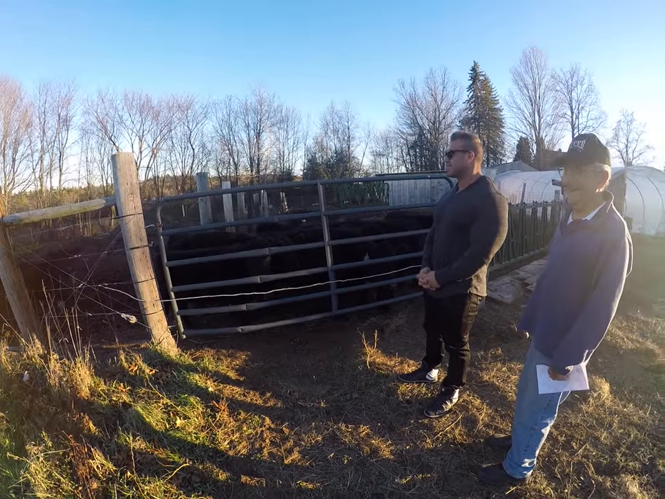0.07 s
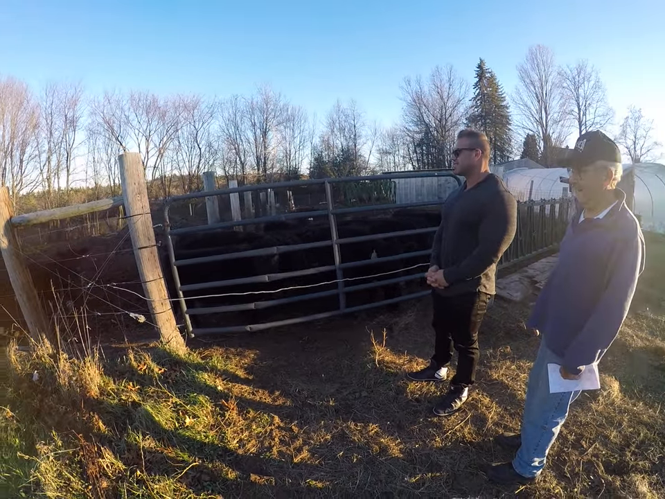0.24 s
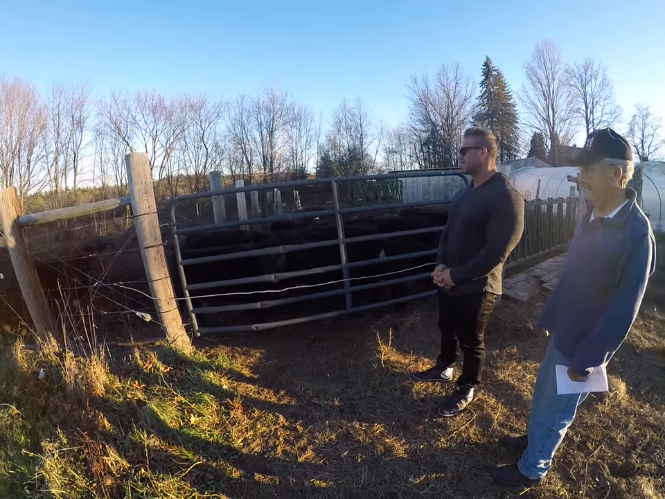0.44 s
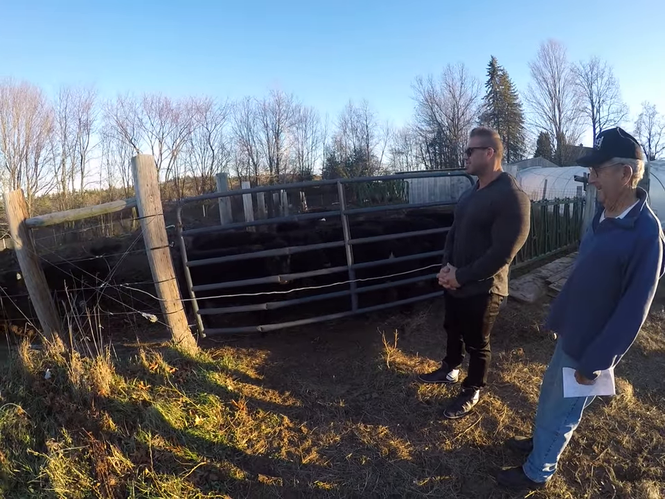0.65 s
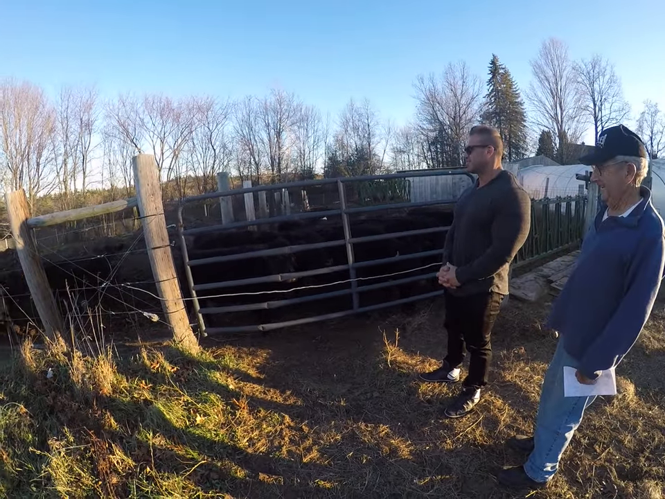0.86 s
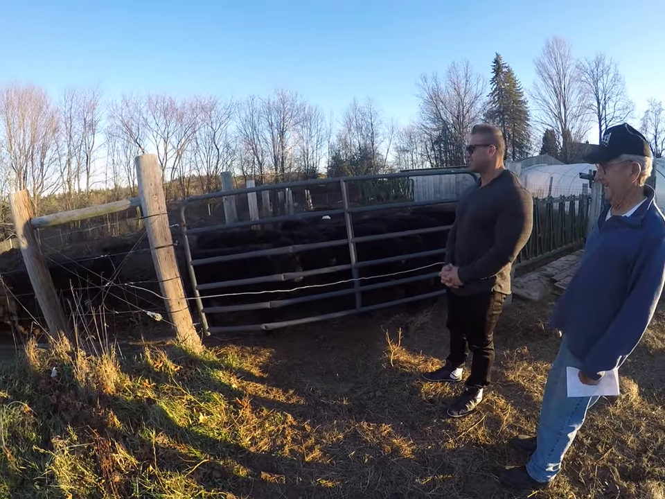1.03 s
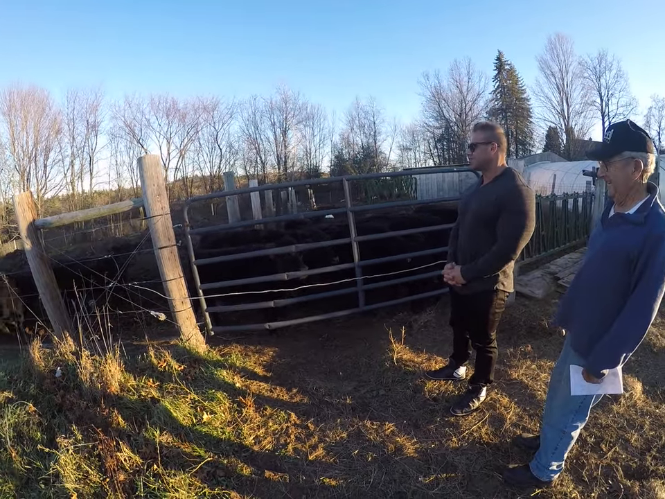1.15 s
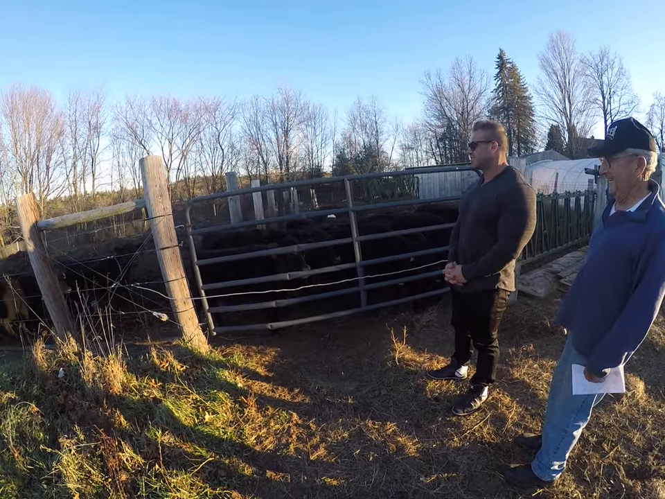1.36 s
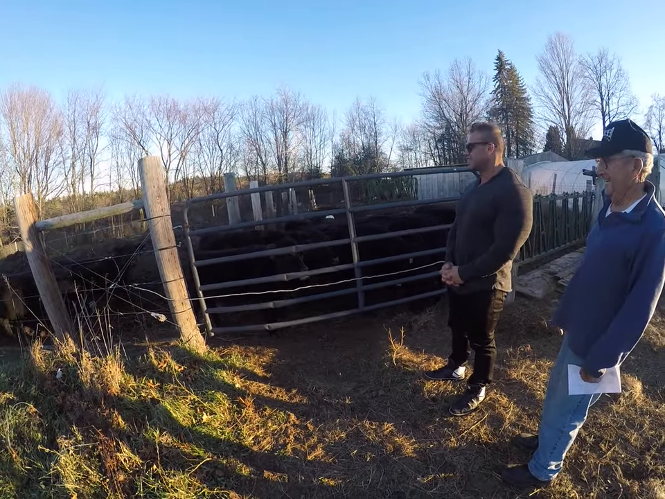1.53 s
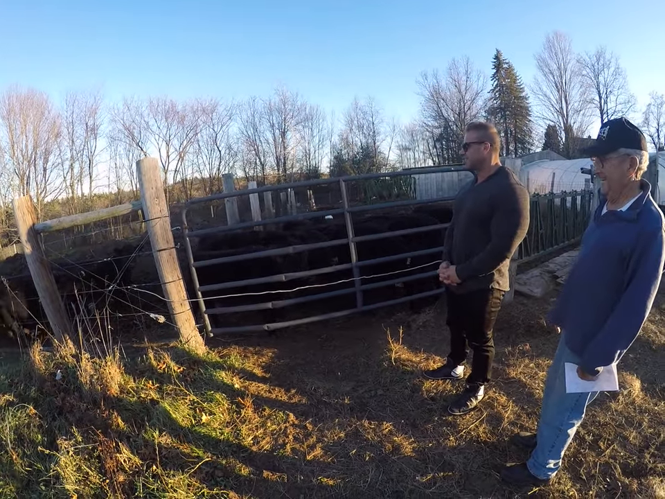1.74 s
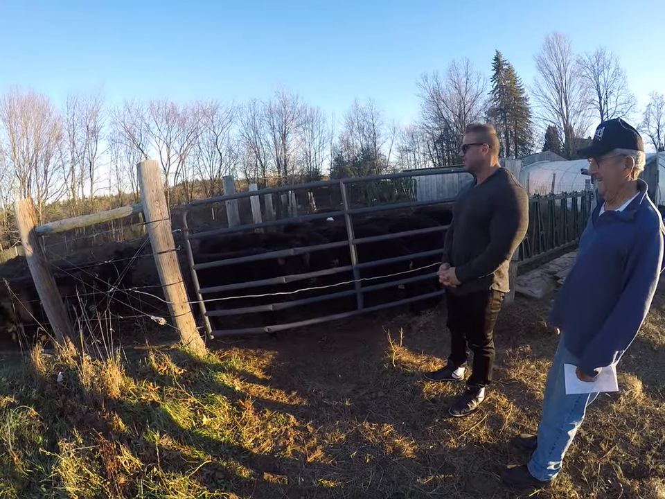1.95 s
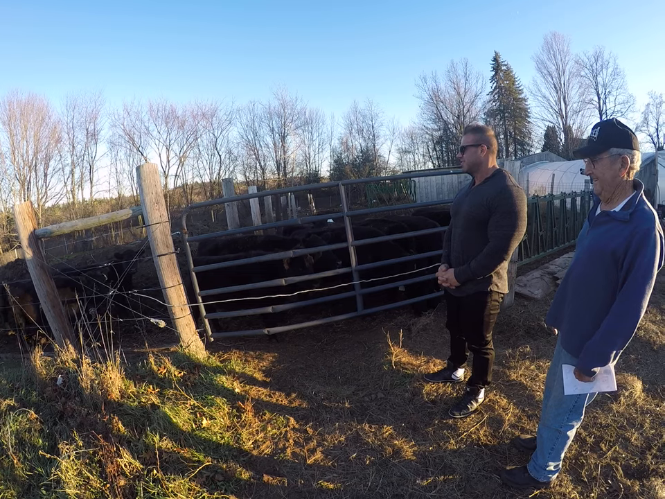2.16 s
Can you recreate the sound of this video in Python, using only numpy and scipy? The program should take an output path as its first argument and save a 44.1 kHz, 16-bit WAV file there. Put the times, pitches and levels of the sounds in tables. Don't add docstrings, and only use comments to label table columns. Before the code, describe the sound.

One cow moos a few metres away in an outdoor pen: a soft nasal hum climbs, opens into a loud held call, then sags and cuts off. Low wind rumble and distant road noise continue behind.

```python
import sys
import numpy as np
from scipy import signal
from scipy.io import wavfile
from scipy.ndimage import uniform_filter1d

SR = 44100
rng = np.random.default_rng(int(sys.argv[2]) if len(sys.argv) > 2 else 0)


def volts(x):
    e = np.asarray(x, float) / 20
    return 10 ** e


def dump(signal):
    limited = np.clip(np.atleast_2d(signal).T, -1, 1)
    pcm = np.round(limited * 32767).astype(np.int16)
    wavfile.write(sys.argv[1], SR, pcm)


N = 96755
STEP = 16


def in_time(rows):
    s, *columns = np.transpose(rows)
    steps = np.arange(0, N + STEP, STEP) / SR
    return [np.interp(steps, s, column) for column in columns]


def full(x):
    return np.interp(np.arange(N) / STEP, np.arange(len(x)), x)


def drift(rate_hz, count):
    r = np.exp(-2 * np.pi * rate_hz * STEP / SR)
    white = rng.standard_normal((count, N // STEP + 2002))
    slow = signal.lfilter([1], [1, -2 * r, r * r], white)[:, 2000:]
    return slow / slow.std(axis=1, keepdims=True)


def tract(resonances, hz):
    return np.sqrt(sum(volts(2 * db) / (1 + (2 * (hz - f) / w) ** 2) ** 3 for f, w, db in resonances))


# [t/s, f/Hz]
FOLD_PITCH = [
    (.17, 91),
    (.4, 109.2),
    (.58, 131.9),
    (.79, 192.2),
    (.93, 221),
    (1.14, 242),
    (1.42, 255.3),
    (1.478, 250),
    (1.55, 188.6),
]
# [t/s, breathy share 0-1, pitch jitter/%]
HOARSENESS = [
    (.17, .15, .3),
    (.6, .2, .4),
    (.7, .5, .6),
    (.8, .25, .2),
    (1, .17, .08),
    (1.43, .12, .06),
    (1.49, .3, .3),
    (1.53, .6, 1.0),
]


def vocal_folds():
    (pitch,), (breath, jitter) = in_time(FOLD_PITCH), in_time(HOARSENESS)
    inertia_s = 0.03
    pitch = uniform_filter1d(pitch, int(inertia_s * SR / STEP))
    pitch = pitch * (1 + jitter / 100 * drift(60, count=1)[0])
    phase = 2 * np.pi * np.cumsum(full(pitch)) / SR
    return pitch, phase, breath


# [t/s, level/dB, mouth opening 0-1, posture (0 half open, 1 wide, 2-3 neck stretched)]
EFFORT_COURSE = [
    (.14, -58.5, 0.093, 0),
    (.2, -37, 0, 0),
    (.42, -34, 0, 0.5),
    (.61, -37, 0.23, 1),
    (.69, -31.5, 0.44, 0),
    (.97, -27.5, 0.83, 1.5),
    (1.13, -27, 0.82, 1.5),
    (1.44, -28, 0.96, 3),
    (1.515, -27, 0.89, 0),
]
# [f/Hz, width/Hz, level/dB]
NASAL = [(123, 35, -0.5), (240, 160, -14), (804, 420, -78), (2742, 240, -16.5), (3350, 180, -25),
         (4024, 170, -22.5), (4790, 150, -27.5), (6300, 450, -41.5)]
# [f/Hz, width/Hz, level/dB half open, level/dB wide, level/dB stretched]
THROAT = [(458, 500, -3.5, -12.5, -7.5), (719.2, 100, 3.5, -1, 0.5), (833.4, 81, -8, 1, -19),
          (1024, 96, -15.5, -2.5, -7), (1140.5, 194, -2, 1.5, 2.5), (1225, 95, -7, -32, -3),
          (1614, 205, 2.5, -10.5, -12.5), (1804.5, 228, -14, -1.5, -5.5), (2129, 170, -9.5, -5.5, -35.5),
          (2539, 295, -11.5, -15.5, -19.5), (3043, 100, -20.5, -18.5, -21.5), (3268, 210, -9, -24, -19.5),
          (3763, 140, -45.5, -29, -36), (5150, 330, -31, -33, -31.5)]
# [f/Hz, width/Hz, level/dB]
CHEST_CAVITY = [(247.1, 42, 9), (209.5, 37, -1)]


def cow():
    s = np.arange(0, N + STEP, STEP) / SR
    pitch, phase, breath = vocal_folds()
    level_db, mouth, neck = in_time(EFFORT_COURSE)
    release_db_per_s = 597
    level_db = level_db - release_db_per_s * np.maximum(s - EFFORT_COURSE[-1][0], 0)
    mouth, neck = np.clip(mouth, 0, 1), np.clip(neck, 0, 3)

    stretch_rise, stretch_from_hz = 0.032, 1700
    throat = []
    for f, w, *db in THROAT:
        moved_hz = f * (1 + stretch_rise * neck * (f > stretch_from_hz))
        throat.append((moved_hz, w, np.interp(neck, [0, 1, 2], db)))
    nose_sink = 1 + 0.18 * (s - 0.405)

    count, waver_db, breath_full_hz = 70, 2.5, 3000
    waver, blur = drift(4.1, count), drift(88, 2 * count)
    start = rng.uniform(-1, 1, count) * np.where(np.arange(count) < 12, 1.8, 0.5)
    voice = np.zeros(N)
    for k in range(1, count):
        hz = k * pitch
        nose = tract(NASAL, hz * nose_sink)
        valley = volts(-26 - 8.5 * np.log2(hz / 1000))
        opened = tract(throat, hz) + tract(CHEST_CAVITY, hz) + valley
        effort = volts(level_db + waver_db * mouth * min(k - 1, 4) / 4 * waver[k])
        top_fade = np.clip(4 - hz / 3000, 0, 1)
        gain = effort * ((1 - mouth) * nose + mouth * opened) * top_fade
        air = np.minimum(breath * hz / breath_full_hz, 1)
        voice -= full(gain * (1 - air + air * blur[k])) * np.cos(k * phase + start[k])
        voice += full(gain * air * blur[k + count]) * np.sin(k * phase + start[k])
    return np.sqrt(2) * voice + rush(phase)


# [t/s, level/dB]
RUSH_COURSE = [
    (.14, -70),
    (.22, -67.5),
    (.4, -73),
    (.62, -70.5),
    (.7, -66),
    (.85, -71.5),
    (1.09, -63),
    (1.5, -69),
    (1.55, -79.5),
]


def rush(phase):
    band = signal.butter(2, [4470, 12900], "band", fs=SR, output="sos")
    noise = signal.sosfilt(band, rng.standard_normal(N))
    level_db = in_time(RUSH_COURSE)[0] + 2.0 * drift(25, count=1)[0]
    throb = 1 - 0.36 * np.cos(phase)
    return full(volts(level_db)) * throb * noise / noise.std()


# [delay t/s, level/dB]
YARD_ECHOES = [
    (0.0107, -20),
    (0.024, -24.5),
    (.047, -24.5),
]


def yard(x):
    dull = signal.lfilter([0.4], [1, -0.6], x)
    return x + sum(volts(db) * np.pad(dull, (int(s * SR), 0))[:N] for s, db in YARD_ECHOES)


# [t/s, peak level/dB]
GRASS_TICKS = [
    (.094, -53),
    (.53, -57),
    (.673, -48),
    (1.384, -49),
    (2.059, -44),
]


def ticks():
    out = np.zeros(N + 400)
    for s, db in GRASS_TICKS:
        burst = rng.standard_normal(300) * np.exp(-np.arange(300) / 18)
        at = int(s * SR)
        out[at:at + 300] += volts(db) * burst / np.abs(burst).max()
    return signal.sosfilt(signal.butter(2, 4000, "high", fs=SR, output="sos"), out[:N])


def banded_noise(spectrum, patchy_db, rate_hz):
    hz, db = np.transpose(spectrum)
    edges = 14 * 2 ** np.arange(0, 10.3, 1 / 3)
    white, out = rng.standard_normal((2, N + SR)), 0
    flicker = drift(rate_hz, count=32)
    for k, (low, high) in enumerate(zip(edges, edges[1:])):
        sos = signal.butter(2, [low, high], "band", fs=SR, output="sos")
        band = signal.sosfilt(sos, white[k % 2])[SR:]
        level = np.interp(np.log(low * high) / 2, np.log(hz), db, left=-90, right=-90)
        out = out + band * full(volts(level + patchy_db * (flicker[k] + 0.2 * flicker[-1])))
    return out / out.std()


# [f/Hz, level/dB per Hz]
WIND_SPECTRUM = [(8.8, -37), (15, -7), (57, -1), (184, -15), (236, -30.5), (300, -79.5), (390, -51),
                 (660, -120)]
# [t/s, level/dB]
GUSTS = [
    (0.0, -39),
    (0.43, -30),
    (0.45, -34.5),
    (1.85, -35.5),
    (2.1, -33),
    (2.19, -36.5),
]


def wind():
    return full(volts(in_time(GUSTS)[0])) * banded_noise(WIND_SPECTRUM, patchy_db=0.5, rate_hz=2.6)


# [f/Hz, level/dB per Hz]
ROAD_SPECTRUM = [(120, -48), (200, -4), (314, -15), (339, -5.5), (475, -10), (856, 2.5), (4000, -37.5),
                 (5200, -69), (8800, -120)]


def road():
    return volts(-36.5) * banded_noise(ROAD_SPECTRUM, patchy_db=1.0, rate_hz=24)


# [f/Hz, level/dB per Hz]
AIR_SPECTRUM = [(3000, -16), (4000, -7), (6000, -4), (9000, -11), (14000, -12), (15400, -25)]


def leaves_and_hiss():
    return volts(-72) * banded_noise(AIR_SPECTRUM, patchy_db=1.5, rate_hz=10)


def scene():
    return (yard(cow()) + ticks() + wind() + road() + leaves_and_hiss())[None]


def top_cut(x):
    return signal.sosfilt(signal.butter(12, 15400, fs=SR, output="sos"), x)


def record(dry):
    return top_cut(dry)


dry = scene()
out = record(dry)
dump(out)
```